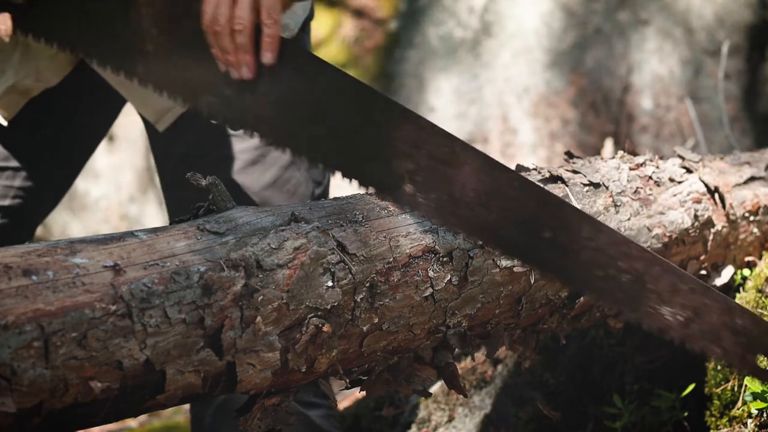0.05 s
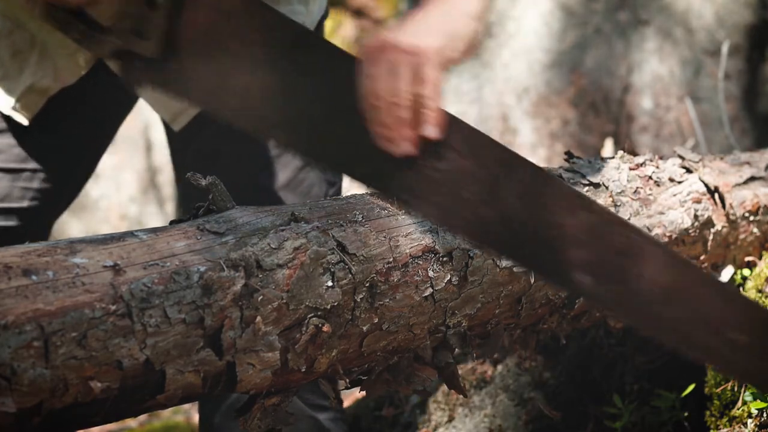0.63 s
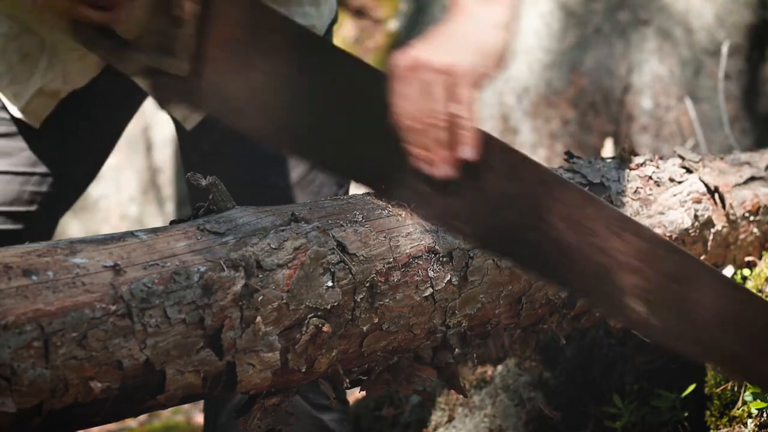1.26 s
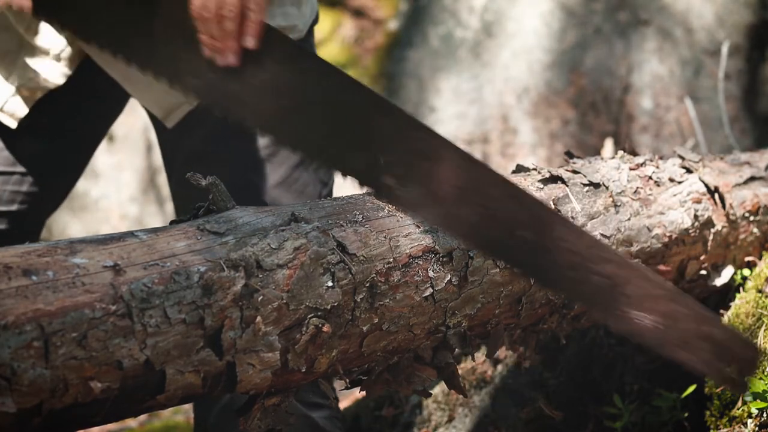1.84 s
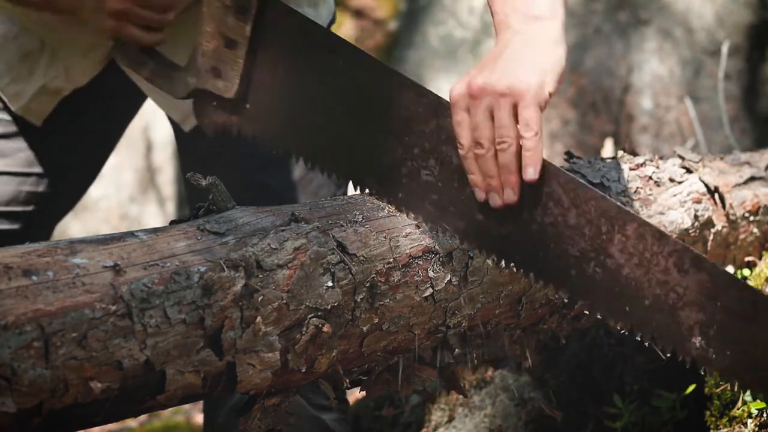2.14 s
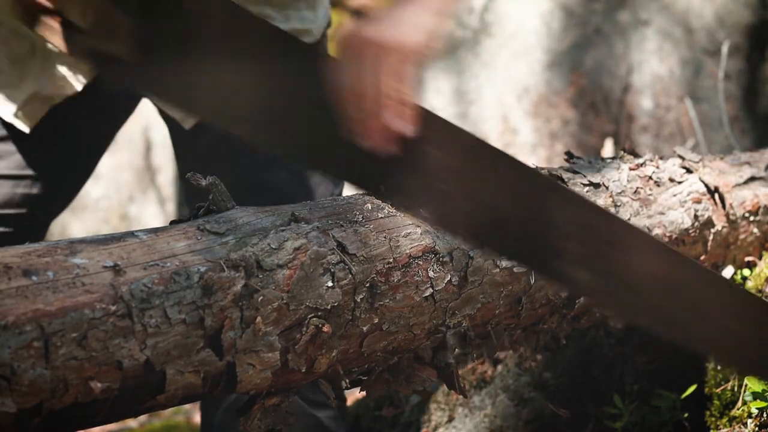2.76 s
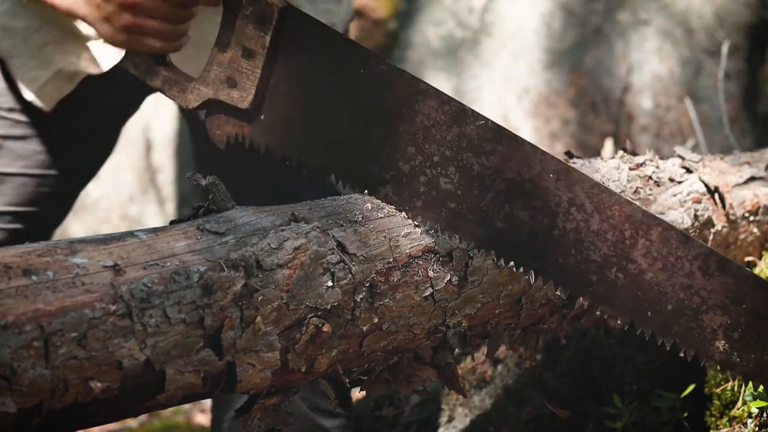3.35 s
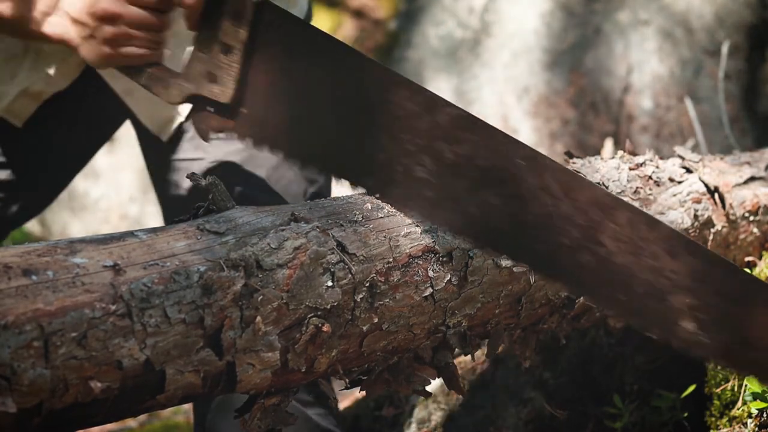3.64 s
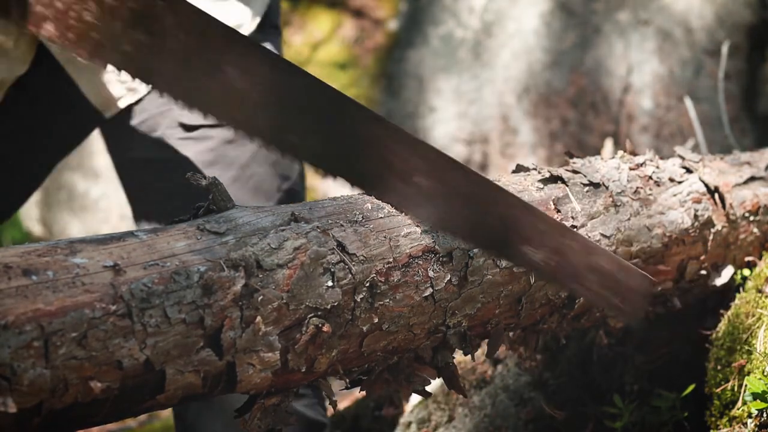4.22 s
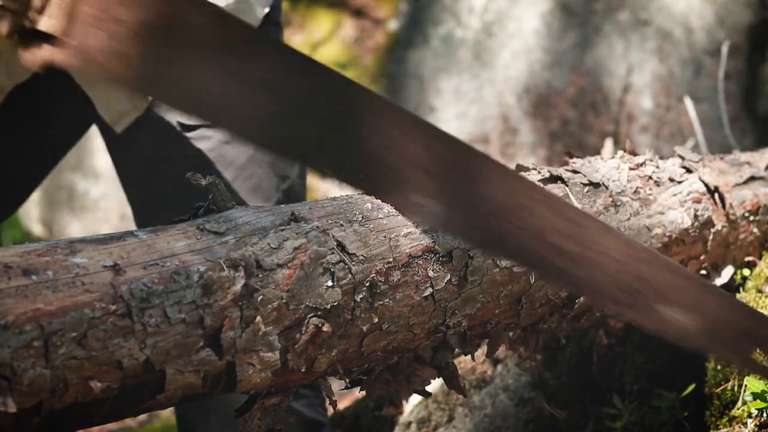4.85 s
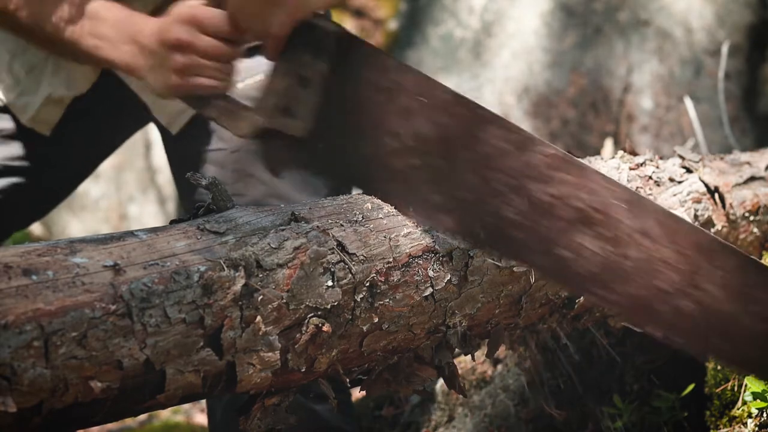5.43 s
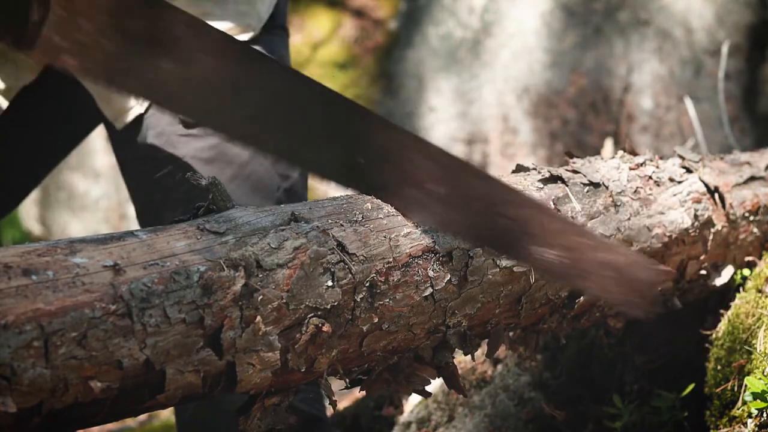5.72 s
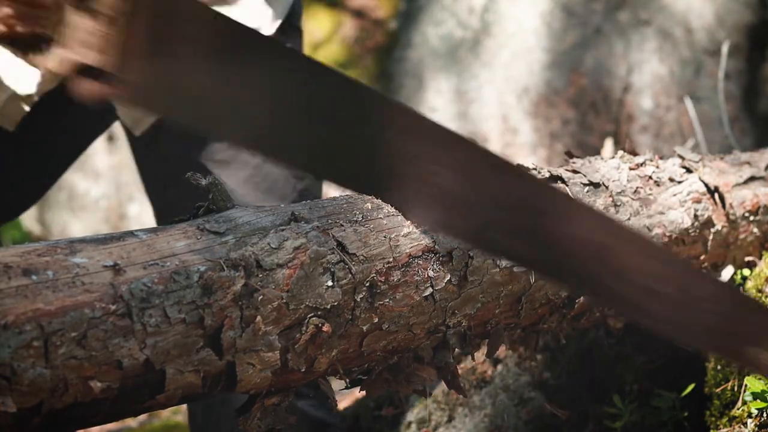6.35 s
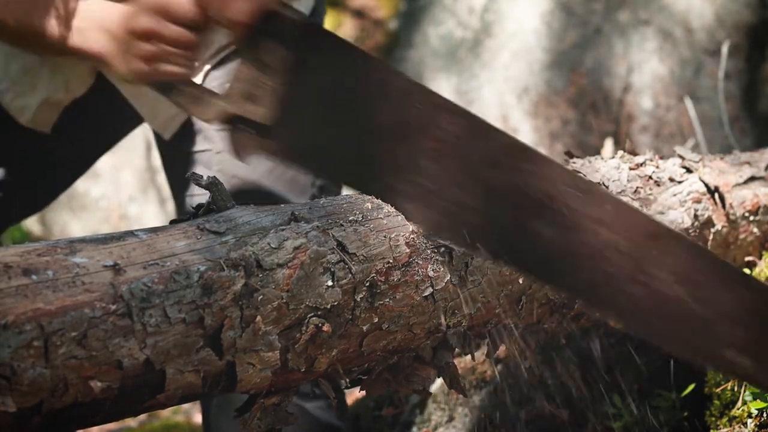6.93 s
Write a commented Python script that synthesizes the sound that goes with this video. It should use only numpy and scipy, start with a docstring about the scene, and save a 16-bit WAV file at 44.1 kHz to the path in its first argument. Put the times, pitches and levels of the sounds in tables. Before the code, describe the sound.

Close, nearly dry rasping of a hand saw tearing through a log outdoors, the blade ringing slightly and catching now and then while the log knocks softly. After about three seconds the strokes stop, leaving a faint rush of trees and a few thin whistles from a far bird. Then the saw starts again, stutters once and settles into a harder, steady back-and-forth rhythm.

```python
"""In a forest, a hand saw cuts a log: softer strokes, a rest, then louder ones.
In each stroke the blade speeds up and brakes; its teeth catch one after another and tear wood fibres,
which hiss, sound the cut and ring the blade. Teeth snag, the steel clinks, the log thuds and rocks.
In the rest a distant songbird is heard over the hush of the trees."""
import sys
import numpy as np
from scipy import signal
from scipy.fft import rfft, irfft, next_fast_len
from scipy.io import wavfile
from scipy.ndimage import uniform_filter1d, map_coordinates

SR = 44100
rng = np.random.default_rng(int(sys.argv[2]) if len(sys.argv) > 2 else 0)


def log_audio(samples):
    """Write samples as a 16-bit WAV file to the path given in sys.argv[1]."""
    # one column per channel
    frames = np.atleast_2d(samples).T
    # limit to full scale, then quantise
    limited = np.clip(frames, -1, 1)
    pcm = np.round(limited * 32767).astype(np.int16)
    wavfile.write(sys.argv[1], SR, pcm)


N = 307818
TIME = np.arange(N) / SR

# fibres tearing on the push (frequency [Hz], relative level [dB])
PUSH_SPECTRUM = [(880, -24), (1500, -5), (1580, -1), (1850, -8), (3030, -3), (3550, -3.5), (3840, -1.5),
                 (4640, -4.5), (5940, -3), (8000, -7.5), (9190, -3), (12700, 1.5), (15100, -0.5),
                 (16000, -7)]
# teeth ripping free (time [s], level [dB], body re level [dB])
TOOTH_SNAGS = [(0.055, -32, -15), (0.172, -22, -13), (0.204, -18.5, -4), (0.372, -18, -2),
               (0.3874, -13, -11), (0.659, -23, -6), (0.69, -17.5, -12), (0.845, -18.5, -2),
               (0.938, -13, -11.5), (1.213, -10.5, -3.5), (1.2464, -12.5, -19), (1.301, -12.5, -12),
               (1.593, -18.5, 0), (1.644, -14, -8), (1.679, -16, -16), (2.109, -9.5, -11),
               (2.349, -21, -10), (2.716, -17, -20), (3.934, -12, -6), (4.741, -20, -8), (4.79, -20, 5),
               (5.5744, -14, -2), (5.617, -24, 8), (6.342, -13.5, -3), (6.435, -11, -22),
               (6.6942, -12, -28), (6.859, -4.5, -11)]
# steel slapping the cut, mostly as a stroke turns (time [s], level [dB], rise [s])
BLADE_SLAPS = [(0.043, -28, 0.006), (0.921, -23, 0.0029), (1.06, -34.5, 0.0028), (1.645, -20.5, 0.0025),
               (1.926, -30, .003), (2.311, -26, 0.0016), (2.679, -37.5, .0025), (3.128, -53, 0.0027),
               (3.513, -45.5, 0.0023), (3.561, -45.5, 0.0022), (4.2765, -34.5, 0.0043),
               (4.7637, -24, .0009), (5.9184, -22, 0.0025), (6.661, -30, .0033)]
HOP_TIMES_S = 4.3455 + 0.0256 * np.arange(9)  # the first push after the rest binds and judders


def sawing():
    """The push bites hard and bright; the pull drags the teeth back, duller. Both shake the log."""
    # forward and back strokes (start [s], length [s], run-up [s], rasp [dB], body [dB], thud [dB])
    pushes = [(0.112, 0.46, .33, -28.5, -34.5, -44), (1.045, 0.43, 0.24, -28, -34.5, -44),
              (1.882, 0.38, 0.26, -24.5, -31, -43), (2.655, 0.36, .24, -24.5, -29.5, -43.5),
              (4.266, 0.44, 0.25, -26, -29, -44), (5.121, 0.4, .215, -21.5, -27, -44),
              (5.898, 0.38, 0.23, -20.5, -26.5, -44.5), (6.64, 0.35, .27, -19, -23, -42)]
    pulls = [(-0.3, .42, .15, -34.5, -41, -44), (0.618, .426, 0.11, -35, -38.5, -46),
             (1.487, 0.4, 0.13, -33.5, -36, -43.5), (2.305, 0.36, .12, -31, -33, -42),
             (3.674, .611, 0.3, -31, -33, -43), (4.705, 0.42, .14, -28.5, -30.5, -44.5),
             (5.526, 0.37, .12, -28, -30.5, -44.5), (6.31, 0.35, 0.076, -28, -31, -45.5)]
    # fibres tearing on the pull (frequency [Hz], relative level [dB])
    pull_spectrum = [(880, -35), (1500, -4), (1790, -1.5), (2140, -8), (2320, -5.5), (2910, -4), (3350, -5),
                     (3620, -3), (4460, -6), (5660, -3), (7390, -8.5), (12100, 0), (14900, 0), (16000, -13)]
    rasp, body, shake, speed = strokes(pushes, brake_share=0.3, rasp_weight_db=1, body_weight_db=2.5,
                                       rasp_power=1.55, body_power=1.54, stop_power=1.4)
    bite = teeth(speed, slow_per_s=30, fast_per_s=68, scatter_db=2.7,
                 rise_s=0.016, fall_s=0.0049, slide_share=0.24)
    push = tearing(rasp * bite, body * bite ** 0.16, PUSH_SPECTRUM, wood_db_per_oct=0.3)
    push += thuds(shake * bite, db_per_oct=0.5)
    rasp, body, shake, speed = strokes(pulls, brake_share=0.33, rasp_weight_db=-0.6, body_weight_db=-0.6,
                                       rasp_power=1.4, body_power=1.38, stop_power=1.15)
    drag = teeth(speed, slow_per_s=31, fast_per_s=56, scatter_db=3.6,
                 rise_s=0.0077, fall_s=0.0043, slide_share=0.39)
    pull = tearing(rasp * drag, body * drag ** 0.5, pull_spectrum, wood_db_per_oct=-2)
    pull += thuds(shake * drag, db_per_oct=1.5)
    return push + pull


def strokes(rows, brake_share, rasp_weight_db, body_weight_db, rasp_power, body_power, stop_power):
    """The blade runs up and brakes; speed and arm weight set the gains. Returns 3 gains, speed 0-1."""
    rasp, body, shake, speed = np.zeros((4, N))
    ease = lambda u: np.sin(np.pi / 2 * np.clip(u, 1e-6, 1))
    weight = lambda u: np.exp(-((u - 0.61) / 0.18) ** 2)  # the arm bears down past mid-stroke
    for start_s, length_s, run_up_s, rasp_db, body_db, thud_db in rows:
        on = (TIME >= start_s) & (TIME < start_s + length_s)
        t = TIME[on] - start_s
        u = t / length_s
        pace = ease(t / run_up_s) * ease((1 - u) / brake_share) ** stop_power
        rasp[on] = amp(rasp_db + rasp_weight_db * weight(u)) * pace ** rasp_power
        body[on] = amp(body_db + body_weight_db * weight(u - 0.13)) * pace ** body_power  # wood lags
        shake[on] = amp(thud_db) * pace ** 0.65
        speed[on] = pace
    grain_db = 1.95 * (1.47 - speed) * wobble(60)  # the grain grips unevenly, most at low speed
    grip = sticking() * amp(grain_db)
    return grip * rattling(rasp, rattle_db=-19), grip * rattling(body, rattle_db=-14), shake, speed


def teeth(speed, slow_per_s, fast_per_s, scatter_db, rise_s, fall_s, slide_share):
    """Gain of teeth catching, more often at speed; each tears a short burst over the steady sliding."""
    rate_per_s = (slow_per_s + (fast_per_s - slow_per_s) * speed ** 2) * np.exp(0.2 * wobble(40))
    catches = np.diff(np.floor(np.cumsum(rate_per_s) / SR), prepend=0)
    energies = amp(2 * scatter_db * rng.standard_normal(N))
    t = TIME[:SR // 16]
    tear = np.exp(-t / fall_s) * (1 - np.exp(-t / rise_s)) ** 2
    power = signal.fftconvolve(catches * energies, tear)[:N]
    local_mean = np.abs(uniform_filter1d(power, SR // 14)) + 1e-6
    tear_share = (1 - slide_share) * np.sqrt(speed)
    return np.sqrt(1 - tear_share + tear_share * np.abs(power) / local_mean)


def tearing(rasp, body, spectrum, wood_db_per_oct):
    """Fractures hiss directly and also sound the wood around the cut."""
    # wood around the cut (frequency [Hz], relative level [dB])
    wood = [(150, -29), (300, -10), (420, -2), (520, 0.5), (640, -1), (800, 1.5), (1000, -1.5), (1200, 1),
            (1420, 1), (1600, -12), (2200, -9), (4000, -76)]
    fine = shifting_rings(fibres(per_s=15000, scatter_db=4), depth_db=3)
    coarse = shifting_rings(fibres(per_s=3000, scatter_db=1.5), depth_db=2)
    hiss = colour(rasp * fine, lambda hz: along(spectrum, hz) + blade_db(hz))
    wood_db = lambda hz: along(wood, hz) + blade_db(hz) + wood_db_per_oct * np.log2((hz + 1) / 1000)
    return hiss + colour(body * coarse, wood_db)


def fibres(per_s, scatter_db):
    """Tiny fractures of unequal size, as two signals of rms 1."""
    breaks = rng.random((2, N)) < per_s / SR
    signs = rng.choice([-1, 1], (2, N))
    return unit(breaks * signs * amp(scatter_db * rng.standard_normal((2, N))))


def blade_db(hz):
    """Narrow peaks that the steel plate lends to the sound of the teeth."""
    # modes of the wedged blade (frequency [Hz], width [Hz], lift [dB])
    modes = [(500, 38, 2), (739.4, 10.7, 6), (870, 19, 4.5), (976, 46, 8), (1058, 16, 9.5), (1148, 22, 8),
             (1992, 14, 7.5), (2160, 34, 7), (2337, 62, 5.5), (2520, 27, 8), (2714, 48, 7.5),
             (2980, 340, 5.5), (4480, 24, 5.5), (5510, 29, 7), (6460, 80, 0.5), (10100, 54, 0),
             (10660, 75, 3), (12400, 120, 5.5)]
    return sum(db / (1 + (2 * (hz - mode_hz) / width_hz) ** 2) for mode_hz, width_hz, db in modes)


def shifting_rings(x, depth_db):
    """The plate slides through the cut, so its brief narrow rings keep changing."""
    spectra = signal.stft(x, nperseg=512)[2]
    field = rng.standard_normal(spectra.shape[1:])
    for axis in (0, 1):
        field = uniform_filter1d(field, size=3, axis=axis)
    return unit(signal.istft(spectra * amp(depth_db * unit(field)), nperseg=512)[1][:, :N])


def sticking(lead_s=0.0085, width_s=0.0049, dip_db=-3):
    """A hooked tooth holds the blade back: the gain dips before each snag, slap and hop."""
    t = TIME[::32]
    releases_s = [row[0] for row in [*TOOTH_SNAGS, *BLADE_SLAPS]] + list(HOP_TIMES_S)
    held = sum(np.exp(-((t - at_s + lead_s) / width_s) ** 2) for at_s in releases_s)
    return amp(dip_db * np.interp(TIME, t, held))


def rattling(gain, rattle_db, fade_s=0.061):
    """The blade rattles on as it turns, adding a faint tail to a stroke's gain."""
    pole = np.exp(-1 / (fade_s * SR))
    tail = signal.lfilter([1 - pole], [1, -pole], gain)
    return np.hypot(gain, amp(rattle_db) * tail)


def snags(hop_db=-9.5, hop_body_db=-19.5, hop_thud_db=-40.5, build_hops=0.98, crest_db=11.5):
    """Single teeth hook and rip free; in the judder they do so in a quick, even row."""
    hops = sum((1 - np.exp(-count / build_hops)) * burst(at_s, rise_s=0.0042)
               for count, at_s in enumerate(HOP_TIMES_S, 1))
    rasp, body = amp(hop_db) * hops, amp(hop_body_db) * hops
    for at_s, db, body_db in TOOTH_SNAGS:
        rip = amp(db) * burst(at_s, rise_s=0.0029)
        rasp += rip
        body += amp(body_db) * rip
    rips = tearing(rasp, body, PUSH_SPECTRUM, wood_db_per_oct=-2) / amp(crest_db)
    return rips + thuds(amp(hop_thud_db) * hops, db_per_oct=-1.5)


def clinks(rest_from_s=3.03, rest_to_s=3.67):
    """The plate slaps brightly against the cut and scratches faintly at rest."""
    # struck steel (frequency [Hz], relative level [dB])
    steel = [(1000, -34), (2900, -26.5), (3700, -12), (4600, -7), (6300, -7.5), (8000, -8.5), (10000, -2),
             (12300, 0), (13700, 5), (15500, -2)]
    slaps = sum(amp(db) * burst(at_s, rise_s) for at_s, db, rise_s in BLADE_SLAPS)
    resting = (TIME > rest_from_s) & (TIME < rest_to_s)
    scratches = resting * amp(-65 + 3.4 * wobble(25.15) + 3.5 * wobble(110))
    chatter = shifting_rings(fibres(per_s=15000, scatter_db=5.5), depth_db=-5.5)
    return colour((slaps + scratches) * chatter, lambda hz: along(steel, hz) + blade_db(hz))


def thuds(shake, db_per_oct):
    """The heavy log answers shaking with dull thuds."""
    # response of the log (frequency [Hz], relative level [dB])
    response = [(25, -37), (45, -14), (72, -1), (98, -6), (140, -0.5), (220, -1), (320, -6.5), (500, -29.5)]
    jolts = shake * fibres(per_s=2500, scatter_db=3)
    return colour(jolts, lambda hz: along(response, hz) + db_per_oct * np.log2(hz + 1))


def rocking(rise_s=0.0037):
    """The log knocks on its bed; each knock rings its low modes at new strengths."""
    # knocks (time [s], relative level [dB])
    bumps = [(0.841, -28), (1.969, -37), (3.927, -28), (4.151, -34), (4.181, -32), (4.214, -25.5),
             (5.105, -27)]
    # modes of the log (frequency [Hz], relative level [dB], t60 [s])
    modes = [(75.4, -13, .08), (147, -10, 0.074), (184, 1, 0.048), (224, -1.5, 0.042), (312, -6, 0.048)]
    knocks, t = np.zeros(N + SR), TIME[:SR // 6]
    for at_s, db in bumps:
        ring = sum(amp(mode_db + rng.normal(0, 2.2) - 60 * t / t60_s) * np.sin(2 * np.pi * hz * t)
                   for hz, mode_db, t60_s in modes)
        knocks[round(at_s * SR):][:len(t)] += amp(db - 1) * ring * (1 - np.exp(-t / rise_s))
    return knocks[:N]


def bird(flutter_hz=197, pitch_swing=0.093):
    """Arching and falling whistles; a fast pitch flutter makes them buzz around the bend."""
    # notes (time [s], length [s], first [Hz], bend [Hz], last [Hz], bend at [0-1], level [dB], buzz [0-1])
    notes = [(3.06, 0.059, 3710, 4040, 2150, 0.26, -49.5, 1),
             (3.144, 0.027, 2110, 3260, 2250, 0.8, -51, .15),
             (3.23, 0.052, 3750, 4080, 2150, .32, -51, 0.8),
             (3.309, .034, 2070, 3340, 2250, 0.7, -51.5, .15), (3.398, .034, 6460, 6100, 4400, .36, -57, 1),
             (3.466, .145, 3310, 3520, 2380, .65, -50.5, 1), (3.601, 0.074, 2500, 2400, 2150, .2, -58, 0.7)]
    song = np.zeros(N)
    trill = np.sin(2 * np.pi * flutter_hz * TIME + 0.78 * wobble(110)) + 0.3 * wobble(500)
    for at_s, length_s, first_hz, bend_hz, last_hz, bend_at, db, buzz in notes:
        on = (TIME >= at_s) & (TIME < at_s + length_s)
        u = (TIME[on] - at_s) / length_s
        flutter = buzz * np.exp(-((u - bend_at) / 0.36) ** 2) * trill[on]
        glide_hz = np.interp(u, [0, bend_at, 1], [first_hz, bend_hz, last_hz])
        pitch_hz = glide_hz * (1 + pitch_swing * flutter)
        envelope = amp(db) * signal.windows.tukey(len(u), 0.3) * (1 - 0.31 * flutter)
        song[on] = envelope * np.sin(2 * np.pi * np.cumsum(pitch_hz) / SR)
    return song


def trunk_echo(x):
    """Trunks scatter sound back, differently to each ear, the high treble dying first."""
    # echo decay (frequency [Hz], t60 [s])
    decay = [(150, 0.37), (1000, 0.24), (4000, 0.26), (14000, 0.051)]
    hz, t, spectra = signal.stft(rng.standard_normal((2, SR)), SR, nperseg=256)
    fade = amp(-60 * t / along(decay, hz)[:, None])
    tail = signal.istft(spectra * fade, SR, nperseg=256)[1]
    delayed = np.pad(tail, ((0, 0), (SR // 128, 0))) / np.linalg.norm(tail[0])
    return signal.fftconvolve(x[None], delayed, axes=1)[:, :N]


def forest(level_db=-50.5):
    """The wide hush of the trees, wavering slightly."""
    # hush (frequency [Hz], relative level [dB])
    spectrum = [(20, -39), (50, -1.5), (141, -1), (223, 0.5), (420, -0.5), (775, -2), (1000, 0.5),
                (1350, -6), (1750, -14), (3200, -14.5), (5000, -24.5), (7500, -28), (11000, -22),
                (16000, -24)]
    # spread (frequency [Hz], side minus mid [dB])
    width = [(60, -25), (110, -19), (200, -7.5), (380, -2.5), (700, -2), (1290, -2), (2380, 0.5), (4400, 0),
             (8120, -1), (15000, -3)]
    # balance (frequency [Hz], left minus right [dB])
    lean = [(60, -1), (200, 4), (380, -1), (700, -5), (1290, -5), (2380, -3.5), (4400, -2), (15000, 2)]
    hush = colour(rng.standard_normal((2, N)), lambda hz: along(spectrum, hz))
    return amp(level_db + 1.5 * wobble(5.04)) * stereo(hush, width, lean)


def amp(db):
    """Decibels to gain."""
    return 10 ** (np.asarray(db) / 20)


def unit(x):
    """Scale to rms 1."""
    return x / np.sqrt(np.mean(x ** 2) + 1e-20)


def along(points, hz):
    """Read (frequency [Hz], value) points on a log axis."""
    points_hz, values = np.transpose(points)
    return np.interp(np.log(hz + 1), np.log(points_hz + 1), values)


def wobble(knots_per_s):
    """Smooth random curve."""
    return map_coordinates(rng.standard_normal(int(N * knots_per_s / SR) + 4), [TIME * knots_per_s])


def burst(at_s, rise_s):
    """Envelope that peaks at 1 after rise_s and dies away."""
    u = TIME[:SR // 8] / rise_s
    envelope = np.zeros(N + SR)
    envelope[round(at_s * SR):][:len(u)] = u * np.exp(1 - u)
    return envelope[:N]


def colour(x, gain_db):
    """Minimum-phase filter shaped by gain_db(hz); white noise keeps its power."""
    size = 2 * next_fast_len(N // 2 + SR // 4)
    gain = unit(amp(gain_db(np.fft.rfftfreq(size, 1 / SR))))
    cepstrum = irfft(np.log(np.maximum(gain, 1e-6)), size)
    cepstrum[1:size // 2] *= 2
    cepstrum[size // 2 + 1:] = 0
    return irfft(rfft(x, size) * np.exp(rfft(cepstrum)), size)[..., :N]


def stereo(pair, width, lean):
    """Mid and side to left and right; level and phase differ between the ears."""
    # phase between the ears (frequency [Hz], left lead [rad])
    lead = [(300, 0.041), (1000, -0.36), (2500, 0.4), (5800, -0.5), (7500, -0.2), (10300, 0.2),
            (13000, -.7), (16000, -0.45)]
    hz = np.fft.rfftfreq(N, 1 / SR)
    mid, side = rfft(pair)
    side *= amp(along(width, hz))
    pan = amp(along(lean, hz) / 2) * np.exp(0.5j * along(lead, hz))
    return irfft(np.array([(mid + side) * pan, (mid - side) / pan]), N)


def scene():
    """The saw close and nearly dry, the bird far off among the trunks."""
    # saw spread (frequency [Hz], side minus mid [dB])
    width = [(60, -53), (160, -22), (330, -7), (500, -16), (1100, -13), (1750, -3), (3000, -16),
             (5000, -16), (6800, -5), (10000, -9.5), (15000, -5.5)]
    # saw balance (frequency [Hz], left minus right [dB])
    lean = [(60, 1.5), (200, -0.5), (330, -3), (700, -1.5), (1050, 3), (1500, 0), (1950, 3.5), (2500, 1.1),
            (5000, 0.5), (6300, 4), (8000, -1.5), (11000, -5), (15000, -0.5)]
    saw = sawing() + snags() + clinks() + rocking()
    saw_echo = amp(-27) * trunk_echo(saw[0])
    song = amp(-0.5) * bird()
    far_bird = song * amp([[1], [-1]]) + amp(-3.5) * trunk_echo(song)
    return stereo(saw, width, lean) + saw_echo + far_bird + forest()


def record(dry, low_hz=33, top_hz=15950):
    """Bass cut and hard upper band limit."""
    bass_cut = signal.butter(4, low_hz, "highpass", fs=SR, output="sos")
    size = next_fast_len(N + SR // 4)
    in_band = np.fft.rfftfreq(size, 1 / SR) < top_hz
    return irfft(rfft(signal.sosfilt(bass_cut, dry), size) * in_band, size)[:, :N]


dry = scene()
out = record(dry)
log_audio(out)
```